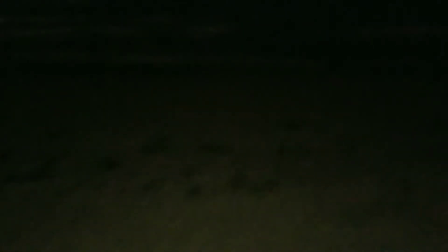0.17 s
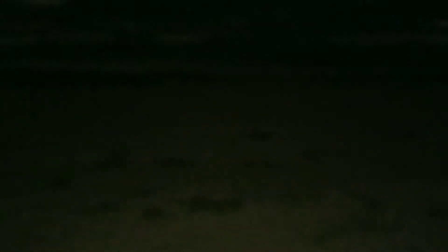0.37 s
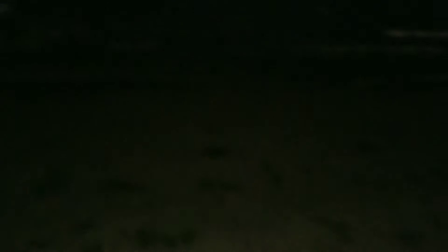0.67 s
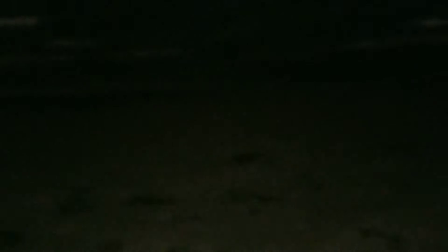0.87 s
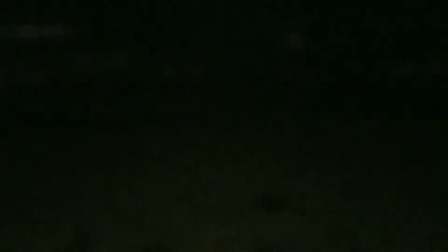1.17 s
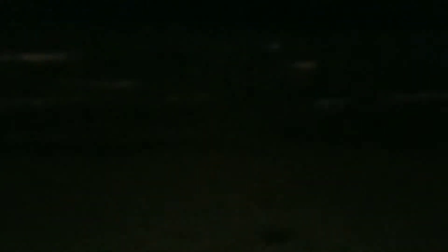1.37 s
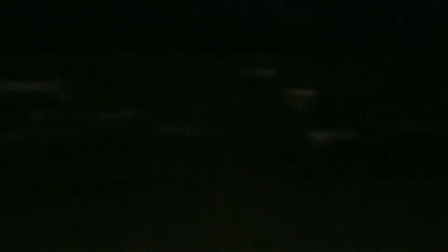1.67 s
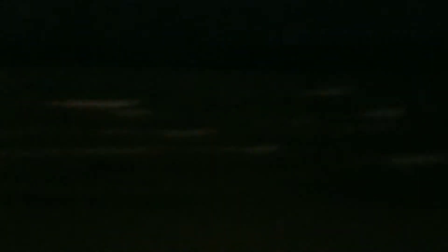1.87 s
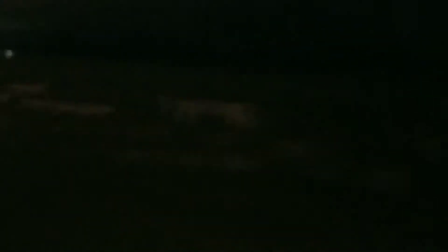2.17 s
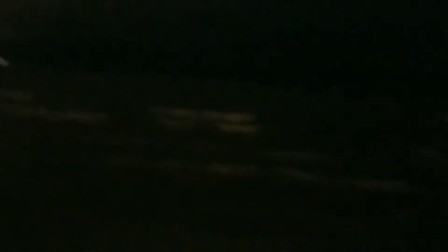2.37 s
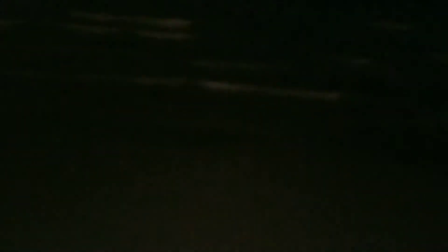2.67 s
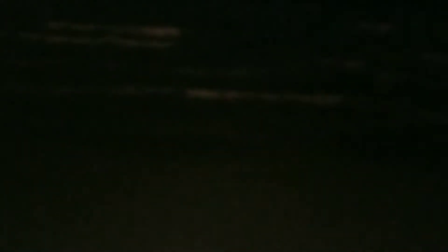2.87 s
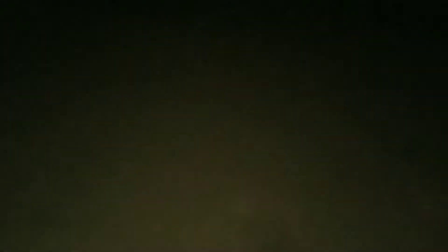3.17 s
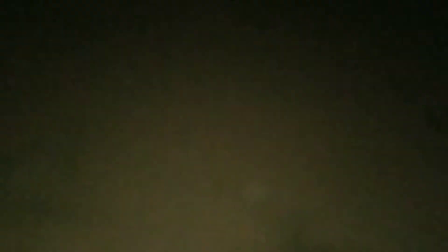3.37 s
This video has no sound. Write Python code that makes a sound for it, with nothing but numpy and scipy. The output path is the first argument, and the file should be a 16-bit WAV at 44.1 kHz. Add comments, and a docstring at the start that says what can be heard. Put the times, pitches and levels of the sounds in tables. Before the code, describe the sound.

Wind buffets a hand-held microphone outdoors, rumbling and thumping unevenly, mostly on the right. A steady, slightly hollow rush like distant surf and a thin hiss lie beneath, and the gusts flutter hardest at the end.

```python
"""Wind on a hand-held camera outdoors at night. From the start there is an even rush, probably distant
surf; the covered left microphone hears it through a hollow resonance near 900 Hz, with little rumble.
All along, eddies (swirls of air) rumble and thump on the bare right microphone, sharper in the gusts,
and air whooshes and hisses across its opening. Around 3 s a faint whistle comes and goes.
Then the wind flutters hardest at the very end, near 3.5 s."""
import sys
import numpy as np
from scipy import signal
from scipy.fft import rfft, irfft
from scipy.io import wavfile
from scipy.ndimage import map_coordinates

SR = 44100
rng = np.random.default_rng(int(sys.argv[2]) if len(sys.argv) > 2 else 0)


def inscribe(sig):
    """Save sig as 16-bit PCM at rate SR to the path in sys.argv[1].

    A 1-D sig is mono; a 2-D sig holds one channel per row.
    Samples are clipped to [-1, 1] before scaling.
    """
    pcm = np.round(np.clip(np.atleast_2d(sig).T, -1, 1) * 32767)
    wavfile.write(sys.argv[1], SR, pcm.astype(np.int16))


N = 155232


def gain(db):
    """Turn decibels into a number to multiply a sound by."""
    return 10 ** (np.asarray(db) / 20)


def loudness(rows, column=1):
    """A gain that glides from row to row of a table's decibel column."""
    rows = np.array(rows)
    return gain(np.interp(np.arange(N) / SR, rows[:, 0], rows[:, column]))


def noise():
    """White noise: all frequencies equally strong."""
    return rng.standard_normal(N)


def shape_tone(sound, tone, delay_s=0):
    """Filter a sound by (frequency [Hz], level [dB]) rows, delay it and set its strength (rms) to 1."""
    hz, db = np.array(tone).T
    freqs = np.arange(N // 2 + 1) * SR / N + 1e-3
    weights = gain(np.interp(np.log(freqs), np.log(hz), db))
    delay = np.exp(-2j * np.pi * freqs * delay_s)
    shaped = irfft(rfft(sound) * weights * delay, N)
    return shaped / shaped.std()


def flicker(per_s, depth_db):
    """A gain that wanders smoothly between random values."""
    steps = rng.standard_normal(2048)
    position = np.arange(N) / SR * per_s
    return gain(depth_db * map_coordinates(steps, [position], order=3, mode="wrap"))


def noise_band(rows, width_hz):
    """Noise around one pitch, following (time [s], level [dB], pitch [Hz]) rows."""
    times, _, hz = np.array(rows).T
    pitch = np.interp(np.arange(N) / SR, times, hz)
    phase = 2 * np.pi * np.cumsum(pitch) / SR
    lowpass = signal.butter(2, width_hz / 2, fs=SR, output="sos")
    slow_noise = signal.sosfilt(lowpass, noise() + 1j * noise())
    band = np.real(slow_noise * np.exp(1j * phase))  # move it up to the pitch
    return band / band.std() * loudness(rows)


# tone of the rush at each microphone (frequency [Hz], relative level [dB])
RUSH_LEFT_TONE = [(60, -14), (220, -6.5), (350, -10), (480, -10.5), (620, -5), (780, -3), (930, -0.5),
                  (1050, -4), (1250, -12.5), (1600, -20), (2000, -29.5), (2500, -33), (3200, -42),
                  (3900, -54), (5000, -67.5), (15000, -65)]
RUSH_RIGHT_TONE = [(60, -1.5), (250, -3), (500, -7.5), (780, 0.5), (950, -2.5), (1250, -3.5), (1600, -5),
                   (2000, -7.5), (2500, -11.5), (3200, -13.5), (4000, -19), (6000, -47)]
# how the rush gently swells (time [s], relative level [dB])
RUSH_SWELL = [(0, -33.5), (.55, -33.5), (.85, -32.5), (1.2, -34), (2.0, -31.5), (2.55, -31), (3.0, -31),
              (3.3, -31.5), (3.52, -30)]

def distant_rush():
    """A broad, far-off wash; the part both microphones share reaches the right one a little later."""
    share = 0.64  # of the power
    common = np.sqrt(share) * noise()
    left = shape_tone(common + np.sqrt(1 - share) * noise(), RUSH_LEFT_TONE)
    right = shape_tone(common + np.sqrt(1 - share) * noise(), RUSH_RIGHT_TONE, delay_s=.00014)
    swell = loudness(RUSH_SWELL) * flicker(per_s=32, depth_db=.5)
    return np.array([left * gain(5), right * gain(1)]) * swell


# a band of noise near 900 Hz on the left, wavering at random in level and pitch
# (time [s], level [dB], pitch [Hz])
HOLLOW_BAND = [(0, -31, 907), (.55, -40, 908.7), (.85, -28, 851), (1.1, -35, 899.7), (1.35, -30.5, 946),
               (1.8, -33.5, 934), (2.2, -33.5, 928), (2.58, -27.5, 926.4), (2.75, -31.5, 918.4),
               (2.95, -34, 919), (2.97, -17.5, 916), (2.99, -24, 909), (3.005, -32, 923.5),
               (3.52, -40.5, 948.3)]

def hollow_resonance():
    """The covered opening favours the part of the rush near 900 Hz, so it sounds hollow."""
    return noise_band(HOLLOW_BAND, width_hz=160)


# tone of the spray (frequency [Hz], relative level [dB])
SPRAY_TONE = [(1500, -42), (2500, -2), (3300, -3), (4000, -1.5), (4600, 1.5), (5200, 4), (5550, -4.5),
              (6050, -11.5), (7200, -15.5), (9000, -15.5), (11000, -15), (12800, -14.5), (15000, -29)]
# how the spray swells (time [s], relative level [dB])
SPRAY_SWELL = [(0, -45.5), (.16, -44), (.28, -46.5), (.4, -45), (1.2, -45.5), (1.9, -44.5), (2.5, -42.5),
               (3.2, -44), (3.52, -43.8)]

def spray():
    """The fine spray of the rush makes the bare opening ring near 5 kHz."""
    fizz = shape_tone(noise(), SPRAY_TONE) * gain(6)
    return fizz * loudness(SPRAY_SWELL) * flicker(per_s=73, depth_db=.82)


def eddies(per_s, scatter_db):
    """Swirls of air give tiny pushes or pulls at random moments; scatter makes them uneven."""
    hits = rng.random(N) < per_s / SR
    return hits * np.sign(noise()) * gain(scatter_db * noise())


# gusts on the bare microphone (time [s], relative rumble level [dB], relative flutter level [dB])
BARE_GUSTS = [(0, -28.5, -26), (.04, -30.5, -43), (.1, -38, -25), (.14, -31, -46), (.35, -33, -44.5),
              (.52, -31, -43), (.6, -29, -29.5), (.76, -27.5, -26), (.86, -29.5, -26.5), (.91, -28, -38),
              (.96, -28, -35), (1.04, -25, -27), (1.12, -32, -33.5), (1.2, -27.5, -29.5),
              (1.31, -29, -40.5), (1.43, -25, -27), (1.5, -27, -30.5), (1.64, -29.5, -37),
              (1.71, -26, -29.5), (1.79, -29.5, -34), (1.88, -28, -41), (2.04, -29, -38.5),
              (2.11, -36.5, -44), (2.19, -29, -36), (2.32, -30.5, -43.5), (2.46, -23.5, -33.5),
              (2.62, -34.5, -45), (2.68, -27.5, -30), (2.77, -26.5, -38), (2.88, -27, -29),
              (2.95, -28, -42.5), (3.06, -26, -24), (3.13, -27.5, -24.5), (3.18, -26, -27),
              (3.27, -26, -23), (3.37, -26.5, -21), (3.44, -28, -25.5), (3.52, -25, -17.5)]
# gusts on the covered microphone (time [s], relative level [dB])
COVERED_GUSTS = [(0, -42), (.13, -34), (.24, -39), (.45, -33.5), (1.0, -36), (1.28, -30), (1.45, -42),
                 (1.56, -30.5), (1.64, -46), (1.72, -27), (1.87, -39), (2.15, -27.5), (2.28, -42),
                 (2.42, -33), (2.64, -31), (3.0, -34.5), (3.4, -31.5), (3.52, -47)]
# tones the eddies make (frequency [Hz], relative level [dB])
BARE_RUMBLE_TONE = [(15, -22), (30, -4), (60, -0.5), (100, 4.5), (150, 3), (220, -3.5), (320, -18),
                    (500, -61), (1000, -64)]
FLUTTER_TONE = [(100, -37), (190, -5), (270, -0.5), (360, -2), (480, -6.5), (650, -15.5), (900, -29),
                (1500, -33), (4000, -56)]
COVERED_RUMBLE_TONE = [(15, -14), (30, 3), (50, 4.5), (90, 0), (140, -3), (250, -10.5), (500, -18.5),
                       (1500, -61), (4000, -90)]

def wind_rumble():
    """Eddies hit each microphone separately; on the right, gusts add a faster flutter to the same hits."""
    kicks = eddies(per_s=1400, scatter_db=2.5)
    rumble = shape_tone(kicks, BARE_RUMBLE_TONE) * loudness(BARE_GUSTS, column=1) * gain(7.5)
    flutter = shape_tone(kicks, FLUTTER_TONE) * loudness(BARE_GUSTS, column=2) * gain(5)
    left_kicks = eddies(per_s=350, scatter_db=0)
    left = shape_tone(left_kicks, COVERED_RUMBLE_TONE) * loudness(COVERED_GUSTS) * gain(1)
    return np.array([left, rumble + flutter])


# air sweeping over the bare opening (time [s], relative level [dB], pitch [Hz])
WHOOSH_PATH = [(0, -35.5, 1642), (.13, -29, 1794), (.19, -33.5, 1850), (.28, -41, 1707), (.42, -33, 1707),
               (.54, -34.5, 1786), (.66, -38.5, 1705), (.94, -35, 1902), (1.28, -38, 1707),
               (1.41, -33.5, 1751), (1.6, -36.5, 1599), (1.8, -33.5, 1698), (2.1, -47, 1702),
               (2.8, -39, 1988), (2.96, -38.5, 2289), (3.2, -41, 1694), (3.39, -32, 2400),
               (3.46, -33, 2093), (3.52, -40, 2016)]

def whoosh():
    """Air sliding over the right opening whooshes around a hollow core, heard faintly on the left."""
    body = noise_band(WHOOSH_PATH, width_hz=1350) * gain(-3)
    core = noise_band(WHOOSH_PATH, width_hz=450) * gain(-6)
    right = (body + core) * flicker(per_s=40, depth_db=1.6)
    return np.array([core * gain(-20), right])


# tone of the hiss (frequency [Hz], relative level [dB])
HISS_TONE = [(4000, -11), (7000, -9.5), (9500, -8), (11000, -4.5), (12000, 2.5), (12800, 5), (13600, 2),
             (14200, 0), (15300, -4)]
# how the hiss comes and goes (time [s], level [dB])
HISS_SWELL = [(0, -49), (.12, -47), (.2, -40), (.26, -60), (.38, -52), (.7, -60.5), (.9, -51), (.97, -47),
              (1.01, -52), (1.09, -45), (1.25, -40), (1.3, -45), (1.36, -45), (1.48, -48.5), (1.57, -60),
              (1.72, -54), (2.1, -53), (2.4, -45), (2.6, -47), (2.72, -40.5), (2.87, -50), (2.96, -45),
              (3.24, -50.5), (3.34, -42), (3.52, -50)]

def hiss():
    """Air brushing the bare opening makes a high, unsteady hiss."""
    air = shape_tone(noise(), HISS_TONE) * loudness(HISS_SWELL)
    return air * flicker(per_s=25, depth_db=1) * flicker(per_s=420, depth_db=1)


# single strong eddies on the bare microphone (time [s], peak level [dB], pitch [Hz])
STRONG_EDDIES = [(.073, -10, 125), (.094, -2.5, 147), (0.17, -12, 123), (0.248, -21, 125), (.268, -14, 90),
                 (0.387, -15, 80), (.408, -18, 85), (.580, -9.5, 155.4), (.653, -12, 80), (.662, -9.5, 85),
                 (0.746, -3, 125), (.765, -5, 192), (.777, -8, 105), (.841, -9, 145), (.848, -8, 110),
                 (.865, -9, 100), (.959, -7, 289), (1.009, -17, 125), (1.154, -5.5, 191.6),
                 (1.170, -11.5, 155.3), (1.202, -17, 155), (1.254, -15, 100), (1.273, -11, 155),
                 (1.295, -8.5, 124), (1.353, -17.5, 100), (1.435, -10, 189.7), (1.490, -13, 99.2),
                 (1.535, -11, 209), (1.541, -11, 240), (1.564, -10, 200), (1.653, -12.5, 100),
                 (1.734, -10, 155), (1.829, -11.5, 159.3), (1.926, -11, 125), (1.976, -17, 85),
                 (2.156, -10.5, 80), (2.212, -14.5, 68), (2.247, -18, 68), (2.267, -12, 125),
                 (2.453, -9.5, 149.4), (2.474, -7, 106), (2.531, -10, 99.9), (2.673, -9, 190),
                 (2.723, -10, 100), (2.827, -7.5, 101), (2.837, -11, 101.2), (2.877, -5, 164),
                 (2.893, -6, 163), (2.916, -2.5, 101), (3.006, -6.5, 80.4), (3.048, -11, 94.5),
                 (3.058, -10, 90), (3.127, -3, 165), (3.180, -15, 190), (3.194, -11, 124.7),
                 (3.239, -9, 129.8), (3.324, -16, 190), (3.336, -14, 235), (3.351, -0.5, 155),
                 (3.363, -10, 157), (3.372, -10, 155), (3.381, -6, 130), (3.425, -9, 189),
                 (3.492, -3.5, 235)]

def thumps():
    """A strong eddy is one push and pull of pressure; a smaller eddy is shorter and so sounds higher."""
    t, pressure = np.arange(N) / SR, np.zeros(N)
    for time_s, peak_db, hz in STRONG_EDDIES:
        phase = 2 * np.pi * hz * (t - time_s)
        pressure -= gain(peak_db) * phase * np.exp((1 - phase ** 2) / 2)
    return pressure


# the whistle's rise and fall (time [s], level [dB], pitch [Hz])
WHISTLE_PATH = [(2.88, -75, 10880), (2.91, -53, 11450), (2.93, -48, 12250), (2.95, -53, 12500),
                (2.965, -53, 12100), (2.995, -54, 11950), (3.02, -64, 11970), (3.05, -55, 12100),
                (3.075, -60, 11400), (3.1, -53, 11090), (3.17, -66, 10600)]

def whistle():
    """Air catching the edge of the bare opening gives a brief, faint, thin whistle."""
    return noise_band(WHISTLE_PATH, width_hz=190) * flicker(per_s=60, depth_db=1)


def scene():
    """Add up the sounds that reach both microphones, then those that reach only one."""
    left, right = distant_rush() + wind_rumble() + whoosh()
    left += hollow_resonance()
    right += spray() + hiss() + thumps() + whistle()
    return np.array([left, right])


def record(dry):
    """The camera thins the deepest bass, flattens peaks that are too big and cuts the highest treble."""
    low_cut_hz, high_cut_hz = 43, 15400
    bass_cut = signal.butter(2, low_cut_hz, "high", fs=SR, output="sos")
    treble_cut = signal.ellip(10, .1, 80, high_cut_hz, fs=SR, output="sos")
    clipped = np.clip(signal.sosfilt(bass_cut, dry), -1, 1)
    return signal.sosfilt(treble_cut, clipped)


dry = scene()
out = record(dry)
inscribe(out)
```